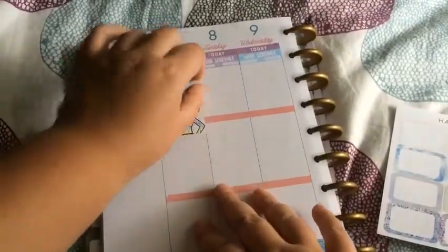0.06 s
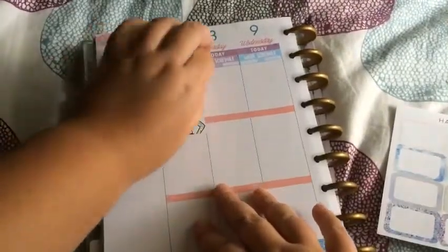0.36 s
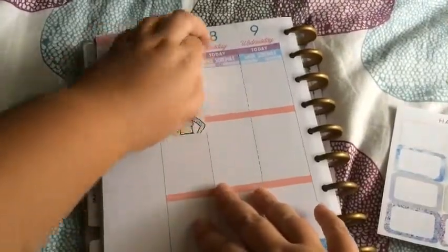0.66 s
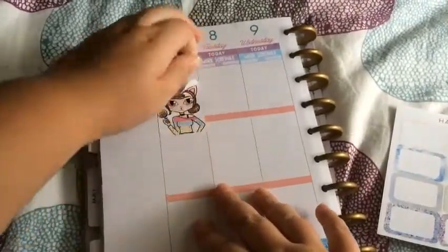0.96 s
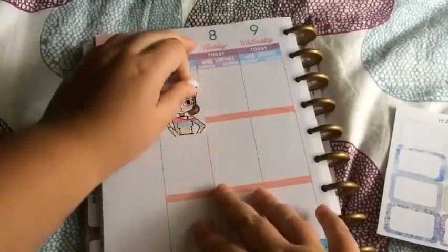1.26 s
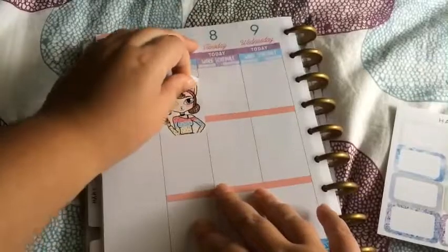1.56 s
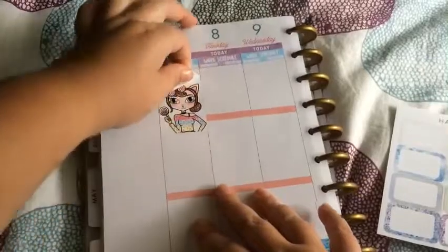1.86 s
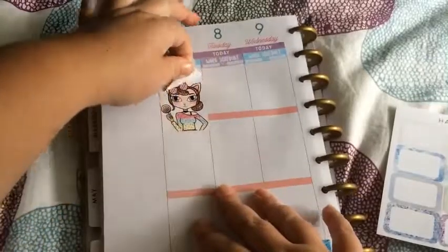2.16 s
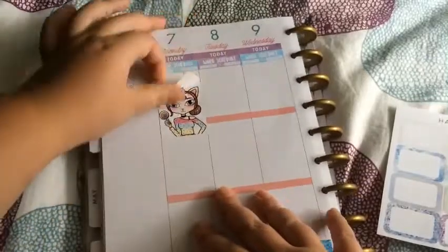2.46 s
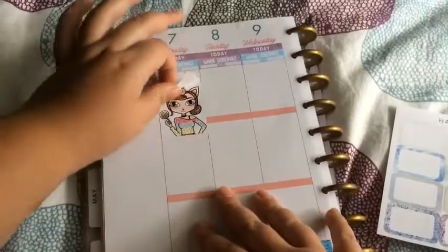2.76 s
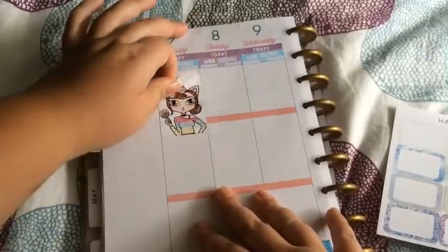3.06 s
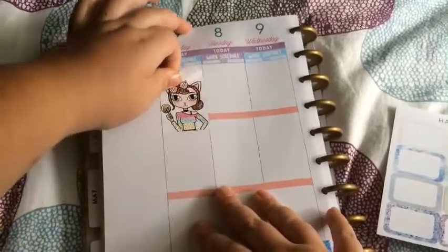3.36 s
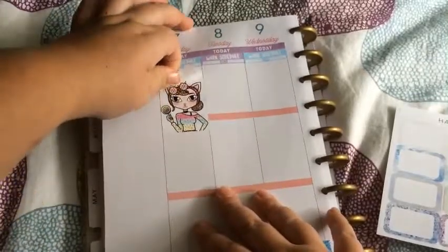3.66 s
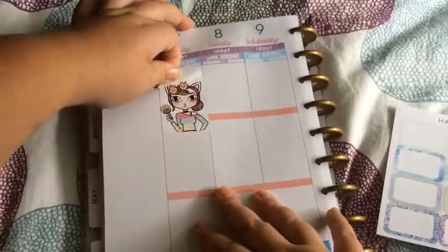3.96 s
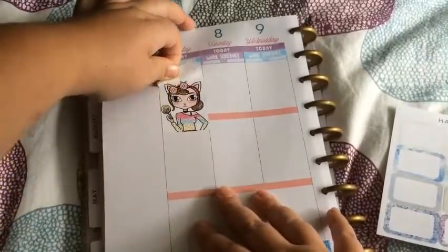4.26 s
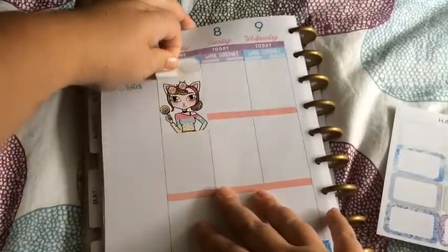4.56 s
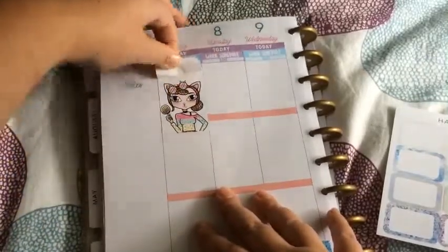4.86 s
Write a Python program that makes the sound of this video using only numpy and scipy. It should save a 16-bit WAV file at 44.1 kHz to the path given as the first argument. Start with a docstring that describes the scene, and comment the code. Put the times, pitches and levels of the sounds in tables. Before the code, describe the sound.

A paper sticker is peeled and pressed against a planner page, with sharp little snaps, crackles and fingertip swishes in a quiet room.

```python
"""A bedroom, close up on a planner: fingers lift a paper sticker off the page and press it down again.
The stiff paper snaps and ticks as it buckles and as the glue lets go, and parting glue strands crackle
in the lifted flap. In between, fingertips swish over the page, an arm shifts on the bedding and the
jolted planner thuds. The room answers briefly, over a low rumble, a distant hum and a faint hiss."""
import sys
import numpy as np
from scipy import signal
from scipy.fft import rfft, irfft, next_fast_len
from scipy.io import wavfile
from scipy.ndimage import uniform_filter1d, map_coordinates

SR = 44100
rng = np.random.default_rng(int(sys.argv[2]) if len(sys.argv) > 2 else 0)


def output_pcm(signal):
    """Save a mono or channel-first signal as 16-bit PCM at the path in sys.argv[1].

    Samples are clipped to [-1, 1] before scaling.
    """
    pcm = np.clip(np.atleast_2d(signal).T, -1, 1) * 32767
    wavfile.write(sys.argv[1], SR, np.round(pcm).astype(np.int16))


N = 224899
TIME = np.arange(N) / SR
HIT_SAMPLES = 4096
HIT_HZ = np.fft.rfftfreq(HIT_SAMPLES, 1 / SR)
LEAD_S = 0.003  # fibres start to give this long before a snap


def amp(db):
    """Decibels to gain."""
    return 10 ** (np.asarray(db) / 20)


def unit(x):
    """x at rms 1."""
    return x / np.sqrt(np.mean(x ** 2) + 1e-30)


def along(points, hz):
    """A curve of (frequency, value) points, read on a log axis."""
    freqs, values = np.transpose(points)
    return np.interp(np.log(hz + 1), np.log(freqs), values)


def hump(hz, centre, q):
    """Gain of a broad resonance with steep skirts."""
    return 1 / (1 + (q * ((hz + 1) / centre - centre / (hz + 1))) ** 2)


def wobble(rate):
    """Smooth random modulation, rate knots a second."""
    return map_coordinates(rng.standard_normal(int(N * rate / SR) + 4), [TIME * rate])


def filtered(x, gain):
    """x through an EQ whose gain is a function of frequency."""
    size = next_fast_len(N + 8192)
    return irfft(rfft(x, size) * gain(np.fft.rfftfreq(size, 1 / SR)), size)[:N]


def noise(eq):
    """Noise coloured by an EQ curve, at rms 1."""
    return unit(filtered(rng.standard_normal(N), lambda hz: amp(along(eq, hz))))


def crackle(rate, scatter_db):
    """Random clicks, rate a second, their levels spread by scatter_db."""
    clicks = (rng.random(N) < rate / SR) * rng.choice([-1, 1], N)
    return clicks * amp(scatter_db * rng.standard_normal(N))


def add(track, s, wave):
    """Mix a wave into the track at time s."""
    part = track[max(round(s * SR), 0):][:len(wave)]
    part += wave[:len(part)]


# EQ of the room's rumble: f/Hz, relative level/dB
RUMBLE_EQ = [(15, -54), (25, -27.5), (33, -17), (45, -4.5), (80, -4), (130, 1), (165, -4.5), (205, -5),
             (250, -9.5), (330, -11), (500, -15), (900, -21), (2000, -31), (6000, -57.5)]
# EQ of the microphone's hiss: f/Hz, relative level/dB
HISS_EQ = [(200, -7.5), (1000, 7.5), (2000, 9), (3300, 1.5), (6000, -4), (10400, -13.5), (11300, -20),
           (12500, -32)]
# tones of a distant appliance: f/Hz, level/dB
HUM_TONES = [(125, -87.5), (204, -79.5)]
def room_tone(rumble_db=-69, hiss_db=-77, waver_db=2.06, drift_rad=1.1):
    """The bed: low rumble, the microphone's own hiss and an appliance's wavering hum."""
    hum = np.zeros(N)
    for hz, db in HUM_TONES:
        peak = np.sqrt(2) * amp(db + waver_db * wobble(12))
        hum += peak * np.sin(2 * np.pi * hz * TIME + drift_rad * wobble(17))
    return amp(rumble_db) * noise(RUMBLE_EQ) + amp(hiss_db) * noise(HISS_EQ) + hum


# the bedroom's decay: f/Hz, t60/s
ROOM_DECAY = [(200, 0.28), (800, 0.12), (2000, 0.12), (5500, 0.11), (11000, 0.12)]
def reverb(x, predelay_s=0.006, wet_db=-15):
    """A short soft room tail in which the lows hang longest."""
    hz, t, bands = signal.stft(rng.standard_normal(SR // 3), SR, nperseg=256)
    decay = amp(-60 * t / along(ROOM_DECAY, hz)[:, None])
    tail = signal.istft(bands * decay, SR, nperseg=256)[1]
    tail = np.pad(tail / np.linalg.norm(tail), (round(predelay_s * SR), 0))
    return amp(wet_db) * signal.fftconvolve(x, tail)[:N]


# fader ride of the shifting arm: t/s, level/dB before trim
ARM_RIDE = [(0.0, -67), (0.24, -76), (0.87, -68.5), (1.24, -79.5), (2.47, -70.5), (2.8, -68), (3.97, -79),
            (4.32, -80), (5.05, -70)]
# EQ of the bedding: f/Hz, relative level/dB
CLOTH_EQ = [(80, -24), (280, 0.5), (450, -1), (1000, -17.5), (3000, -40.5)]
def arm(trim_db=-6, waver_db=5.5):
    """Soft, dull swells of cloth under the moving arm."""
    level_db = trim_db + np.interp(TIME, *np.transpose(ARM_RIDE)) + waver_db * wobble(6.3)
    return amp(level_db) * noise(CLOTH_EQ)


# EQ of skin on paper: f/Hz, relative level/dB
SKIN_EQ = [(500, -67), (2000, -20.5), (3200, -6.5), (4200, -2), (6000, -0.5), (8000, -3), (10000, 1),
           (11200, -17), (12500, -25)]
def skin(slips):
    """Gives tiny slips the bright tone of skin on paper, at rms 1."""
    return unit(filtered(slips, lambda hz: amp(along(SKIN_EQ, hz))))


# fader ride of the creeping hand: t/s, level/dB before trim
HAND_RIDE = [(0.0, -79), (0.6, -79.5), (0.8, -77), (2.38, -72.5), (2.74, -77), (3.56, -79), (4.53, -75),
             (5.05, -78)]
# EQ of its silky whisper: f/Hz, relative level/dB
WHISPER_EQ = [(1000, -15.5), (3000, -0.5), (6000, -1.5), (9000, 3.5), (10800, 0.5), (12500, -16.5)]
def resting_hand(trim_db=2, tick_db=-6, waver_db=1):
    """The hand whispers as it creeps on the page, with a fine crackle of catching fibres."""
    ticks = skin(crackle(rate=500, scatter_db=5))
    level_db = trim_db + np.interp(TIME, *np.transpose(HAND_RIDE)) + waver_db * wobble(9.2)
    return amp(level_db) * (noise(WHISPER_EQ) + amp(tick_db) * ticks)


def squeak(s=3.2, width_s=0.023, centre_hz=7930, glide_per_s=1.7, peak_db=-74):
    """A fingertip sticks and slips very fast: a faint rising whistle."""
    hz = centre_hz * (1 + glide_per_s * np.clip(TIME - s, -2 * width_s, 2 * width_s))
    swell = np.exp(-((TIME - s) / width_s) ** 2)
    return amp(peak_db) * swell * np.sin(2 * np.pi * np.cumsum(hz) / SR)


def friction(grain_db=3):
    """Dense tiny slips of uneven strength."""
    return rng.standard_normal(N) * amp(grain_db * wobble(900))


# fingertip slides: start t/s, end t/s, swish f/Hz, swish level/dB before fades, hiss/dB over the swish
FINGER_STROKES = [(-0.02, 0.058, 1600, -71.5, 6), (0.16, 0.273, 1440, -70.5, -4),
                  (0.69, 0.785, 1600, -72, 0.5), (0.771, 0.841, 1670, -49.5, -5),
                  (1.343, 1.56, 1580, -69, -3), (1.913, 1.943, 2050, -57.5, 2),
                  (2.115, 2.383, 2050, -75, -11), (2.406, 2.483, 2460, -66, 0.5),
                  (3.24, 3.318, 3700, -72.5, -2), (3.309, 3.361, 2000, -68, 0),
                  (4.835, 5.052, 2240, -73, -12.5), (5.04, 5.097, 1900, -56, -4),
                  (5.081, 5.12, 1840, -41.5, -10.5)]
def strokes(swish_q=1.97, fade_db=5.5, sag_octaves=0.23, attack_share=0.08, release_share=0.056):
    """Skin hisses over fibres and the page resonates: a swish, softer and lower as the finger slows."""
    out = np.zeros(N)
    hiss = skin(friction())
    slips = friction()
    for start, end, swish_hz, swish_db, hiss_db in FINGER_STROKES:
        progress = (TIME - start) / (end - start)
        touch = (1 + np.tanh(progress / (2 * attack_share))) / 2
        lift = (1 + np.tanh((1 - progress) / (2 * release_share))) / 2
        done = np.clip(progress, 0, 1)
        high = unit(filtered(slips, lambda hz: hump(hz, swish_hz * 2 ** (sag_octaves / 2), swish_q)))
        low = unit(filtered(slips, lambda hz: hump(hz, swish_hz / 2 ** (sag_octaves / 2), swish_q)))
        swish = (1 - done) * high + done * low
        out += touch * lift * amp(swish_db - fade_db * done) * (swish + amp(hiss_db) * hiss)
    return out


# jolts of the planner: t/s, f/Hz, starting level/dB, t60/s
PLANNER_JOLTS = [(0.869, 233, -44, 0.029), (1.0581, 202, -41, 0.019), (1.072, 64.5, -56, .09),
                 (4.634, 110, -50.5, 0.11)]
def thuds():
    """The jolted planner sinks on the bedding: soft, quickly damped knocks."""
    out, t = np.zeros(N), np.arange(HIT_SAMPLES) / SR
    for s, hz, db, t60 in PLANNER_JOLTS:
        add(out, s, amp(db - 60 * t / t60) * np.sin(2 * np.pi * hz * t))
    return out


# resonances of the lifted flap: f/Hz, width/Hz, relative level/dB
FLAP_MODES = [(2170, 800, -1), (2870, 560, -9.5), (4190, 1300, -7), (5930, 650, -4.5), (7200, 810, -3),
              (9040, 1100, -3)]
def flap(hz):
    """Gain of the sticker's loose end, which rings in broad papery bands."""
    return sum(amp(db) * hump(hz, centre, centre / width) for centre, width, db in FLAP_MODES)


# pulls on the sticker: start t/s, end t/s, crackle level/dB at the end
STICKER_PULLS = [(3.633, 4.007, -74), (4.3, 4.465, -73), (4.571, 4.628, -59)]
def peel(strands_per_s=900, tautness=1.8, swell_db=5.5, release_db_per_s=149.5):
    """Glue strands part one by one, each plucking the flap; pulled taut, it rings more narrowly."""
    level = np.zeros(N)
    for start, end, db in STICKER_PULLS:
        slack = np.clip((end - TIME) / (end - start), 0, 1)  # the crackle grows with the tension
        since_end = np.maximum(TIME - end, 0)
        level += (TIME > start) * amp(db - swell_db * slack - release_db_per_s * since_end)
    strands = crackle(strands_per_s, scatter_db=6)
    return level * unit(filtered(strands, lambda hz: flap(hz) ** tautness))


def settling(cues, trim_db=-28, delay_s=0.0056, t60_s=0.11, ticks_per_s=1200):
    """After each snap the sheet crinkles on, the more so the brighter the snap and harder the flutter."""
    level, t = np.zeros(N), np.arange(SR // 3) / SR
    for s, level_db, _, crack_db, tick_db, flutter_db in cues:
        brightness = min(1, np.hypot(amp(crack_db), amp(crack_db + tick_db)))
        add(level, s + delay_s, brightness * amp(level_db + flutter_db + trim_db - 60 * t / t60_s))
    ticks = crackle(ticks_per_s, scatter_db=0)
    return level * unit(filtered(ticks, lambda hz: flap(hz) ** 1.1))


def snap_force(flutter_db, lead_db=-13, flutter_t60_s=0.013):
    """Fibres start to give, the paper breaks free, and bending waves flutter to and fro in the sheet."""
    t = np.arange(HIT_SAMPLES) / SR - LEAD_S
    lead = rng.standard_normal(HIT_SAMPLES) * amp(-24 * abs(t) / LEAD_S) * (t < 0)
    flutter = rng.standard_normal(HIT_SAMPLES) * amp(-60 * abs(t) / flutter_t60_s) * (t > 0)
    force = amp(lead_db) * lead / np.linalg.norm(lead)
    force += amp(flutter_db) * flutter / np.linalg.norm(flutter)
    force[round(LEAD_S * SR)] = 1  # the break itself
    return force


def struck(force, gain):
    """A body with this gain answers a short force, evened out across the bands: a hit of energy 1."""
    spectrum = rfft(force, HIT_SAMPLES)
    trend = np.sqrt(abs(uniform_filter1d(abs(spectrum) ** 2, size=50)))
    cepstrum = irfft(np.log(np.maximum(gain / trend, 1e-6)))
    cepstrum[1:HIT_SAMPLES // 2] *= 2  # minimum phase keeps the attack sharp
    cepstrum[HIT_SAMPLES // 2 + 1:] = 0
    wave = irfft(np.exp(rfft(cepstrum)) * spectrum)
    return wave / np.linalg.norm(wave)


# EQ of the thump in the pad of pages: f/Hz, relative level/dB
THUMP_EQ = [(30, -20), (90, -24), (210, -2.5), (330, -6.5), (460, -6.5), (650, -14), (900, -5),
            (1300, -14.5), (3000, -73)]
# EQ of the glue's tick: f/Hz, relative level/dB
TICK_EQ = [(2000, -40), (6000, -29), (7700, 2), (9000, -1.5), (10400, 10), (11300, 2), (12500, -2)]
# paper snaps: t/s, level/dB over 4 ms, flex f/Hz, crack/dB over the flex, tick/dB over the crack,
# flutter/dB over the break before trim
SNAP_CUES = [(0.8483, -48.5, 1600, 11, -15, 2), (0.8595, -44.5, 1400, 14, -5, -9),
             (0.865, -34.5, 1070, 12, -14, 5), (0.87, -24, 1430, -7.5, 12.5, -2),
             (0.9028, -45, 1500, 10, -8, 13), (1.0606, -33.5, 1310, -14, -2, -1.5),
             (1.0626, -36, 2310, -12.5, -2.5, 6), (1.2587, -58.5, 1200, 6, -17, -16),
             (1.2643, -59.5, 2640, -1, -12, 5), (1.9707, -38, 2950, 6, 6.5, -17),
             (1.9876, -53.5, 1810, 12, -1, -10), (2.216, -59.5, 1170, -3.5, -5, -3),
             (2.4684, -26.5, 1725, -1.5, -0.5, -6), (2.7116, -49, 1560, -9, 3.5, -6),
             (2.7424, -59, 2000, 18, -5, -7), (2.8203, -58, 1600, -11, 5, -7),
             (3.448, -63.5, 1800, -12, 0, -10), (4.097, -66.5, 2100, -21, -5, -7),
             (4.5722, -50.5, 2200, 12, -1, -8), (4.5804, -48, 1900, 18, -6, -2),
             (4.615, -39.5, 2090, 13, -9.5, -5), (4.629, -32.5, 1100, 8.5, -21.5, -1.5),
             (4.631, -20, 2080, 12.5, -14.5, 7), (4.7518, -47, 2000, -7, -9, 3),
             (4.77, -40, 1910, -6.5, -8.5, 5), (4.7756, -47.5, 1710, -4, -4, -1),
             (4.8027, -56, 1720, -6, -2, -9), (5.0368, -53, 1900, -7, -8, -8),
             (5.0703, -44, 1920, 0, -8, -15), (5.0776, -42, 1500, 4, -24, -6),
             (5.0955, -19.5, 2000, -6, -12, -2)]
def snaps(flex_q=1.62, mid_flex_hz=1704, crack_hz=4930, crack_q=1.44, ring=4.4, flutter_trim_db=3):
    """The loose paper flexes, its edge cracks, the glue ticks and the pages thump; then it settles."""
    out = np.zeros(N)
    ringing = 1 + ring * flap(HIT_HZ)
    for s, level_db, flex_hz, crack_db, tick_db, flutter_db in SNAP_CUES:
        flex = unit(hump(HIT_HZ, flex_hz, flex_q))
        edge_hz = crack_hz * 2 ** (0.021 * crack_db)  # a sharper snap cracks higher
        crack = amp(crack_db) * unit(ringing * hump(HIT_HZ, edge_hz, crack_q))
        tick = amp(crack_db + tick_db) * unit(ringing * amp(along(TICK_EQ, HIT_HZ)))
        sheet = unit(np.sqrt(flex ** 2 + crack ** 2 + tick ** 2))
        thump_db = -22 - 13 * np.log2(flex_hz / mid_flex_hz)  # a larger piece flexes lower, thumps harder
        thump = amp(thump_db) * unit(amp(along(THUMP_EQ, HIT_HZ)))
        hit = struck(snap_force(flutter_db + flutter_trim_db), np.hypot(sheet, thump))
        add(out, s - LEAD_S, np.sqrt(0.004 * SR) * amp(level_db) * hit)
    return out + settling(SNAP_CUES)


def scene():
    """The mono mix: close paper with a touch of reverb, over the arm and the room tone."""
    paper = snaps() + thuds() + peel() + strokes() + squeak() + resting_hand()
    return (paper + reverb(paper) + arm() + room_tone())[None]


def record(dry):
    """A brick-wall high cut on the mix."""
    cutoff_hz = 11700
    return np.array([filtered(x, lambda hz: 1 / np.sqrt(1 + (hz / cutoff_hz) ** 100)) for x in dry])


dry = scene()
out = record(dry)
output_pcm(out)
```